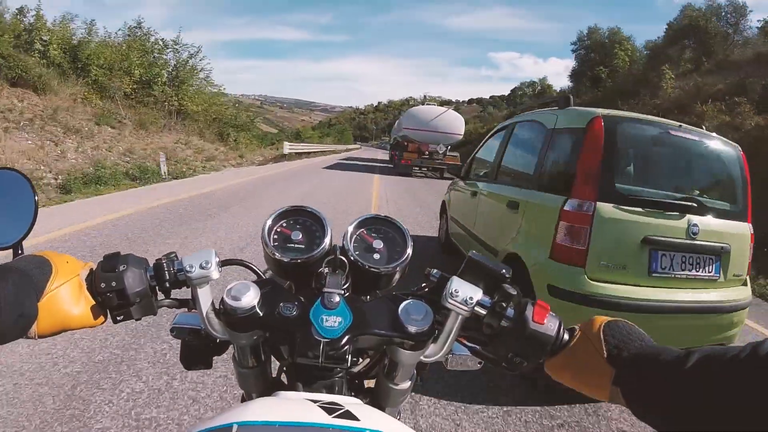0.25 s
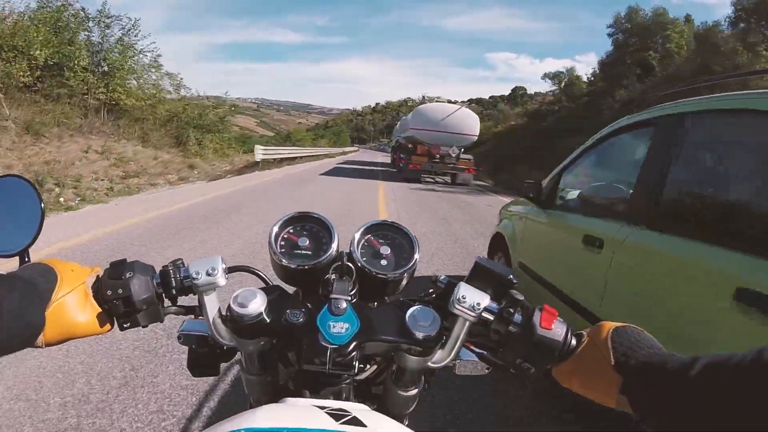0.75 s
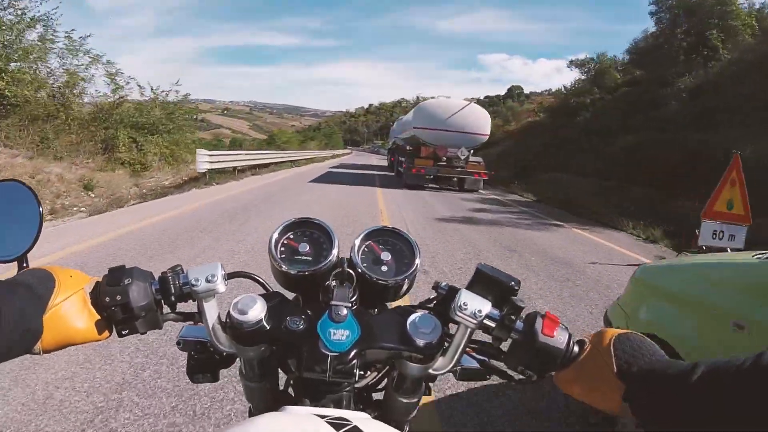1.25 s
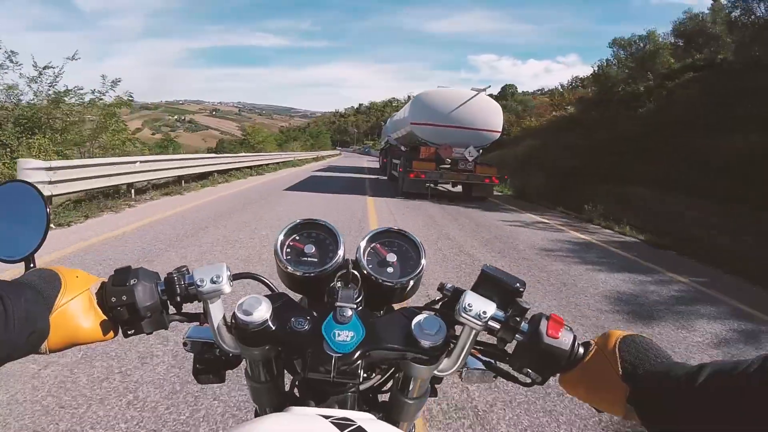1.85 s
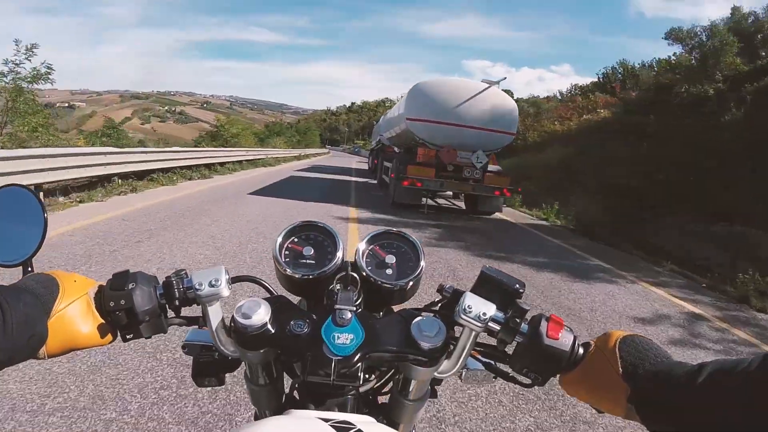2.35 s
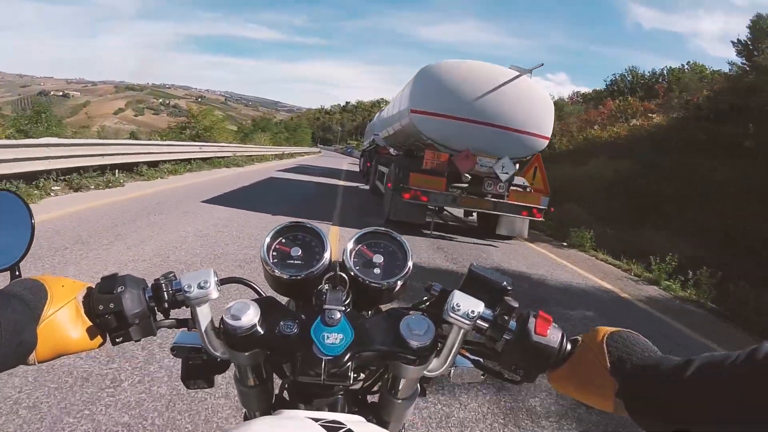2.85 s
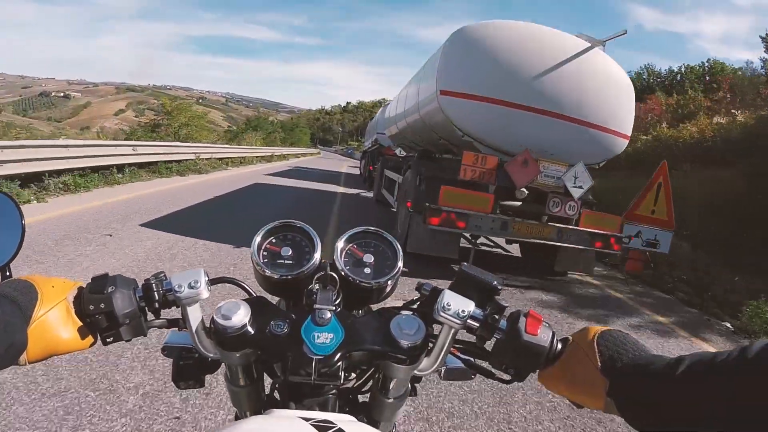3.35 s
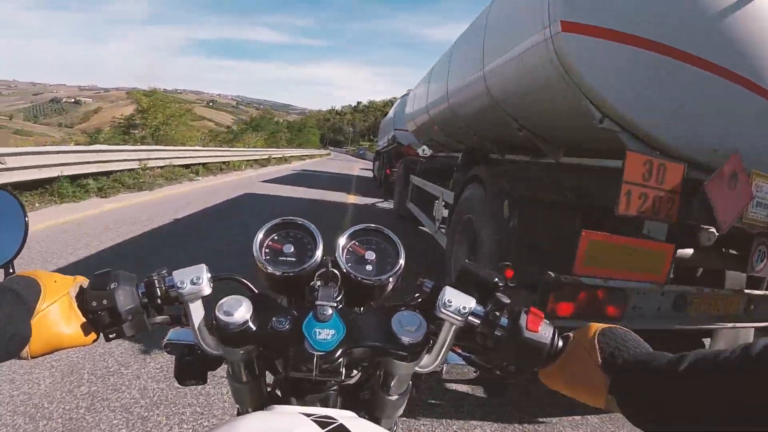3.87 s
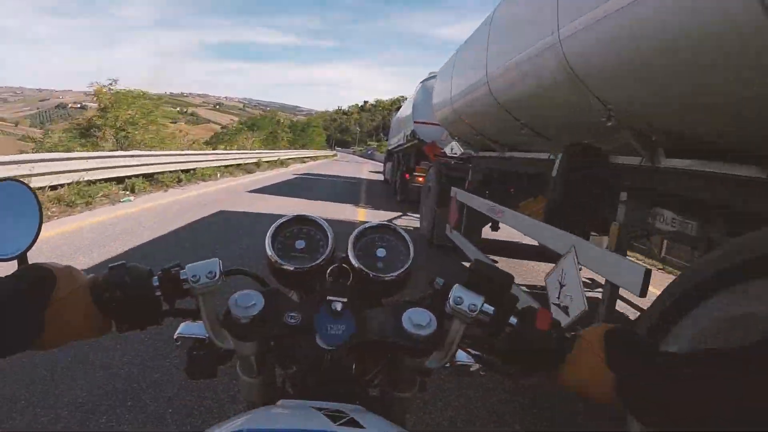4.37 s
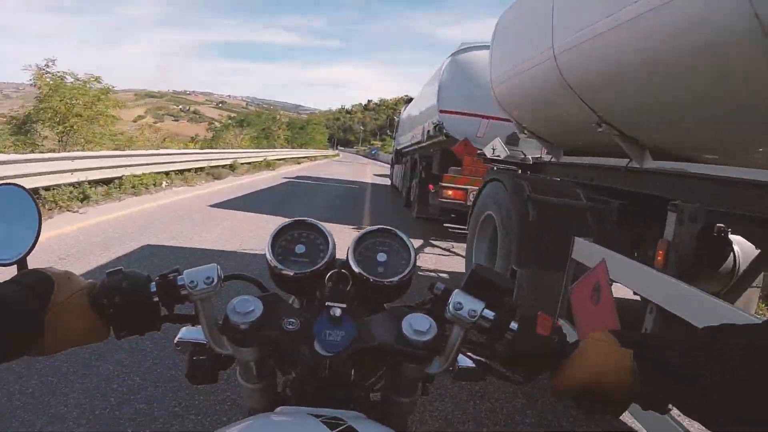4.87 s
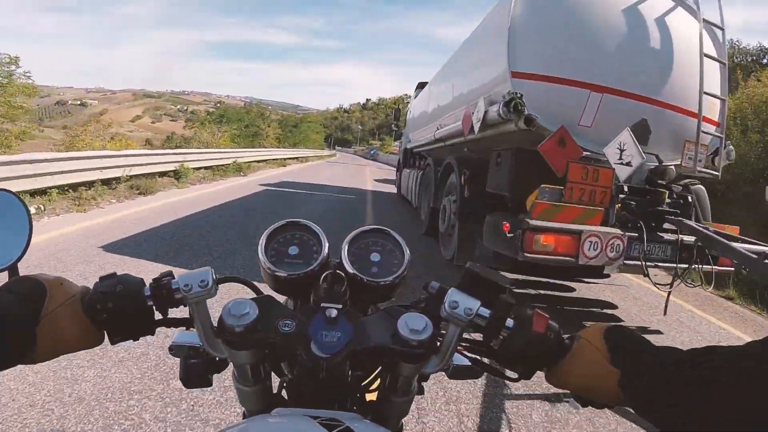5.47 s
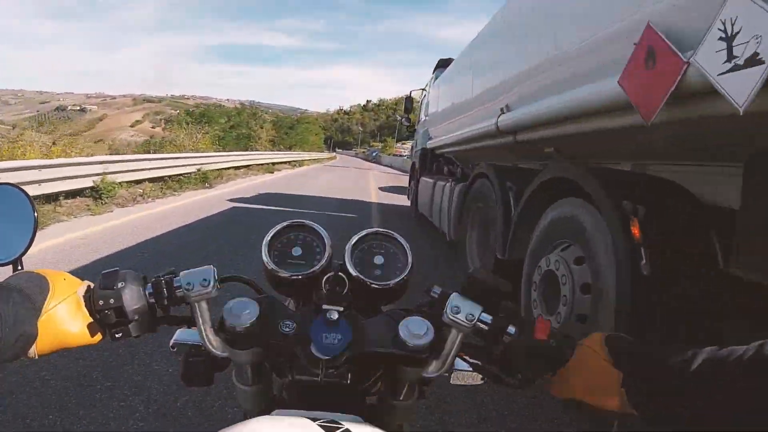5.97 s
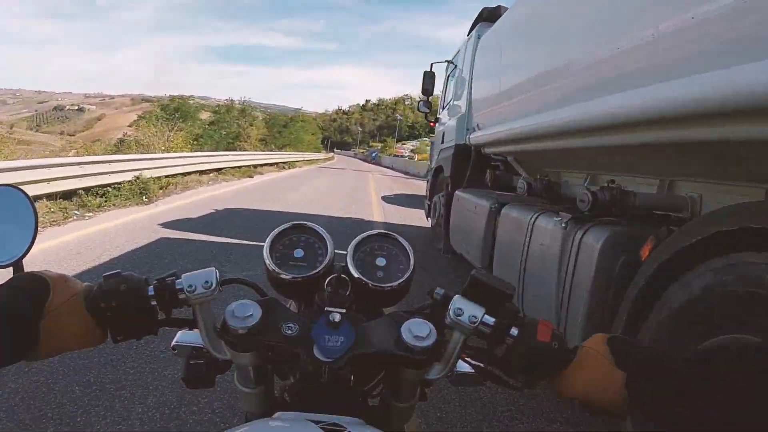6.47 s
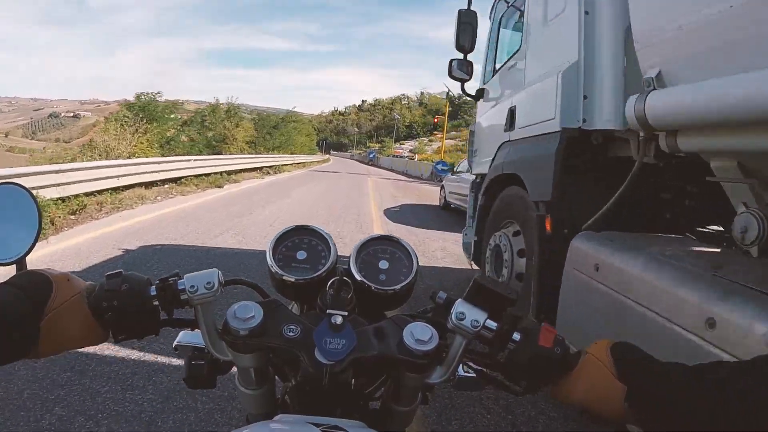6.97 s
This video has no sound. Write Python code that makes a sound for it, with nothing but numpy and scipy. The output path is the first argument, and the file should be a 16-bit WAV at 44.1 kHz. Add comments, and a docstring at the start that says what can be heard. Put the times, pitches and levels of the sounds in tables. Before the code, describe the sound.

Close motorcycle engine, uneven paired firings with hollow exhaust pulses, gas rasp and metallic clatter, decelerating steadily. A brief tyre hiss marks a car being overtaken. Around four seconds the engine coasts down to low idle and a tanker lorry's broad rumble comes up on the passing side. Downshift blips bark and crackle, each followed by a falling hum, with small metal clicks. Outdoors, slight wind, microphone on the rider's body.

```python
"""On the road, microphone at the rider's chest: a V-twin motorcycle passes a car on a closed throttle,
drops to idle with the clutch pulled and rolls along a tanker lorry; barks mark three downshift blips.
Unevenly spaced firings are pulses that ring resonant filters; gas rasp and crackle are gated noise,
ringing metal and pipes are decaying sines, gear whines and a faint squeal are sines,
and lever clicks are noise bursts. Behind lie coloured noise for tyres, car, lorry and a little wind."""
import sys
import numpy as np
from scipy import signal
from scipy.fft import rfft, irfft, next_fast_len
from scipy.io import wavfile
from scipy.ndimage import uniform_filter1d

SR = 44100
rng = np.random.default_rng(int(sys.argv[2]) if len(sys.argv) > 2 else 0)


def materialize(psi):
    """Save the field psi as 16-bit PCM at rate SR to the path in sys.argv[1].

    A 1-D psi becomes a single channel; in a 2-D psi each row is a channel.
    """
    bounded = np.clip(np.atleast_2d(psi).T, -1, 1)
    quanta = np.round(bounded * 32767).astype(np.int16)
    wavfile.write(sys.argv[1], SR, quanta)


N = 317961
TIME = np.arange(N) / SR  # s
CRUISE_HZ = 21  # four-stroke cycles per second at which the engine levels are stated


def engine(speed, cycles):
    """The V-twin at close range: suction, idle pops, steep fronts, gas rasp and knocking metal per firing."""
    times, cylinder = firings(cycles, jitter_s=.00004)
    scatter_db = spread(.8, count=len(times))  # firings differ a little in strength
    idling = idle_share(speed)
    rasp_db = loudness((-60.5, 0.67, -3.5), speed)
    pulses = suction(speed, times, cylinder, scatter_db, idling)
    pops = idle_pops(times, cylinder, scatter_db, idling)
    front = fronts(speed, times, cylinder, idling)
    metal = clatter(times, undb(rasp_db - 1.5) * (1 - idling))  # a little below the rasp
    return pulses + pops + front + gas_rasp(times, rasp_db) + metal


# Engine speed while the wheel drives it: [t/s, four-stroke cycles per second/Hz]
IN_GEAR_SPEED = [(0, 20.34), (.3, 18.55), (.45, 18.99), (.65, 23.26), (1, 22.72), (2, 21.04), (3, 19.35),
                 (3.959, 17.64)]
# Throttle blips: [t/s, rise/s, gain in cycles per second/Hz, coast/s]
THROTTLE_BLIPS = [(5.167, .072, 8.61, .759), (5.913, .115, 2.0, .385), (6.33, .139, 8.17, .769)]
IDLE_HZ, COAST_S, COAST_BEND = 10.725, .829, 1.458  # cycles per second, time to idle, bend of the fall


def engine_speed():
    """Cycles per second: held by the wheel, then coasting to idle; each blip spins it up and it coasts again."""
    def coast(start, length):
        # falls fast at first
        return np.clip(1 - (TIME - start) / length, 0, 1) ** COAST_BEND
    release_s = IN_GEAR_SPEED[-1][0]
    speed = IDLE_HZ + (curves(IN_GEAR_SPEED)[0] - IDLE_HZ) * coast(release_s, COAST_S)
    for start, rise, gain, length in THROTTLE_BLIPS:
        spin_up = np.clip((TIME - start) / rise, 0, 1)
        speed = speed + gain * spin_up * coast(start + rise, length)
    return speed


FIRST_FIRING, VEE_GAP = .25, 270 / 720  # in cycles


def firings(cycles, jitter_s):
    """Times of all firings and their cylinder: the second follows after 270 degrees, then 450 of rest."""
    count = np.arange(2 * int(cycles[-1] + 1))
    cylinder = count % 2
    due = count // 2 + FIRST_FIRING + VEE_GAP * cylinder
    times = np.interp(due, cycles, TIME, right=TIME[-1] + 1)
    return times + jitter_s * rng.standard_normal(len(times)), cylinder


def clutch():
    """0 in gear, 1 with the lever pulled."""
    pull_s, takes_s = 4.15, .04
    return np.clip((TIME - pull_s) / takes_s + .5, 0, 1)


def cracked():
    """1 while the throttle is just open, 0 once it is shut."""
    shut_s = 0.884
    return np.clip((shut_s - TIME) / 0.06 + .5, 0, 1)


def idle_share(speed):
    """Idle firing takes over at low speed, clutch pulled; a wavering share pops on the cracked throttle."""
    catch_hz, catch_range_hz = 14.24, 0.48  # cycles per second
    idling = clutch() * (1 + np.tanh((catch_hz - speed) / (2 * catch_range_hz))) / 2
    popping = np.minimum(0.14 * undb(3 * walk(30)), 1)
    return idling + popping * cracked()


def loudness(law, speed):
    """Level in dB of a part of the engine sound: in gear at CRUISE_HZ, rise per Hz, change clutch pulled."""
    cruise_db, db_per_hz, free_db = law
    return cruise_db + db_per_hz * (speed - CRUISE_HZ) + free_db * clutch()


# Exhaust resonances on a closed throttle in gear: [f/Hz, level/dB]
OVERRUN_RESONANCES = [(20, -36), (40, -3), (62, 7), (95, 4), (125, -3), (155, -6), (178, -13.5), (210, -4),
                      (240, -6), (258, -11), (292, -6), (335, -29), (390, -15.5), (450, -22), (570, -36.5),
                      (700, -33), (1150, -56), (9000, -135)]
# Exhaust resonances while the engine spins down freely: [f/Hz, level/dB]
COASTING_RESONANCES = [(25, -43), (40, -9), (55, 7), (72, 8), (88, 4), (105, -10), (135, -0.5), (165, -7.5),
                       (215, -2.5), (260, -12.5), (295, -5), (335, -24), (450, -16.5), (580, -30.5),
                       (900, -43.5), (9000, -130)]


def suction(speed, times, cylinder, scatter_db, idling):
    """Closed throttle: hollow suction pulses return from the pipe end; coasting, a smooth falling hum."""
    lead_s, echo_ms, echo_share = 0.00068, 10.53, 0.43
    # each suck starts just before the steep front, loosely timed with the clutch pulled
    looseness_s = .0004 * np.interp(times, TIME, clutch())
    sucks = times - lead_s + looseness_s * rng.standard_normal(len(times))
    size = undb(scatter_db - 1.5 * (cylinder - .5))  # the second cylinder sucks less
    pulses = train(sucks, size)
    # the pipe gives back the lows of each pulse
    echo = colour(train(sucks + echo_ms / 1000, size), [(300, -0.5), (600, -5.5), (1200, -18.5)])
    pulses = (pulses + echo_share * echo) * (1 - idling)
    overrun_gain = undb(loudness((-23.5, 0.18, -0.39), speed)) * (1 - clutch())
    overrun = -play(pulses * overrun_gain, ring(OVERRUN_RESONANCES))
    hum = -play(pulses * undb(-26.5) * clutch(), ring(COASTING_RESONANCES))
    return body(overrun, speed) + hum


def body(pulses, speed):
    """Faster running gives the suction pulses more body in the low middle."""
    db_per_hz, from_hz = 1.62, 17.06  # growth, and the cycles per second where it is neutral
    middle = colour(pulses, [(185, -24), (220, -1), (265, 0), (300, -14), (340, -30)])
    growth_db = db_per_hz * np.maximum(speed - from_hz, -1)
    return pulses + middle * (undb(growth_db) - 1)


# Exhaust resonances at idle: [f/Hz, level/dB]
IDLE_RESONANCES = [(25, -41.5), (50, 0), (72, 6.5), (86, 8), (100, -1), (120, -9.5), (150, -2.5),
                   (180, 2.5), (235, -0.5), (285, 1), (335, -20), (450, -16), (600, -40.5), (1000, -49),
                   (9000, -125)]


def idle_pops(times, cylinder, scatter_db, idling):
    """Idle: short, even pops ring the exhaust, the second cylinder 3 dB stronger."""
    pop = undb(scatter_db - 3.0 * (2.5 - cylinder))
    return play(train(times, pop) * undb(-20) * idling, ring(IDLE_RESONANCES))


# Resonances set off by the steep front of a pulse: [f/Hz, level/dB]
FRONT_RESONANCES = [(100, -33.5), (335, 8), (390, 11.5), (455, 11), (570, -1), (690, 8), (800, -4),
                    (920, -11), (1090, -17.5), (1270, -34.5), (1600, -18), (2250, -40), (3700, -50),
                    (12000, -78)]
# Level of the pulse fronts along the ride: [t/s, level/dB]
FRONT_LEVEL_IN_TIME = [(.8, 0), (1.15, -3.5), (1.6, -4), (2.2, -3), (2.7, 0), (3.15, 3), (3.9, 1)]


def fronts(speed, times, cylinder, idling):
    """Each firing starts with a front, steeper on some than on others, that snaps and rings the headers."""
    full_hz, fade_db_per_hz = 21.2, 3  # below this speed the front flattens
    steep = undb(spread(5.0, count=len(times)) - 1.7 * cylinder)
    front_db = loudness((-29.5, -0.061, -2), speed) + curves(FRONT_LEVEL_IN_TIME)[0]
    front_db = front_db - fade_db_per_hz * np.maximum(full_hz - speed, 0)
    # flatter at idle and on a cracked throttle
    flatter_db = -25 * idling * clutch() - 7 * cracked()
    snap = -play(train(times, steep) * undb(front_db + flatter_db), ring(FRONT_RESONANCES))
    # against the front, the header ring grows as the engine slows
    header_gain = undb(front_db + 1.5 * (CRUISE_HZ - speed)) * (1 - clutch()) * (1 - cracked())
    return snap + headers(times, cylinder, header_gain)


# Ring of each cylinder's header pipe: [f/Hz, level/dB against the front, t60/s]
HEADER_PIPES = [(792, -10, 0.021), (1056, -16, 0.022)]


def headers(times, cylinder, gain):
    """A sharp front rings each cylinder's own header pipe as a decaying sine."""
    size = undb(spread(4.5, count=len(times)))
    return -sum(play(train(times, size * (cylinder == k)) * gain, modes([mode]))
                for k, mode in enumerate(HEADER_PIPES))


# Colour of the gas noise of every firing: [f/Hz, level/dB]
RASP_COLOUR = [(150, 2), (450, 10.5), (750, 5), (1000, -0.5), (1270, -7.5), (1600, -4), (2250, -9),
               (2600, -15.5), (3700, -18), (4500, -28), (5400, -26.5), (7000, -33), (8200, -23),
               (10500, -56.5)]


def gas_rasp(times, rasp_db):
    """Gas rushes out in two close bursts after each firing and dies away in the rest, over a steady floor."""
    attack_s, decay_s = 0.0011, 0.012
    gas = undb(spread(2.5, count=len(times)))
    bursts = train(times, gas) + .5 * train(times + 0.0012, gas)
    gate = play(bursts, fade(decay_s) - fade(attack_s)) + 0.17
    return gated(gate / gate.std() * undb(rasp_db), RASP_COLOUR, side_db=-6.0)


# Ring of the engine's metal: [f/Hz, level/dB, t60/s]
ENGINE_METAL = [(1522, 1.5, 0.034), (2290, -4, 0.042), (3250, -10.5, 0.022), (3820, -9.5, 0.023),
                (4070, -21.5, 0.14), (5400, -15.5, 0.024)]


def clatter(times, gain):
    """Each firing knocks the engine's metal, every mode a little late and with a strength of its own."""
    sound = 0
    for mode in ENGINE_METAL:
        late = times + .005 * rng.random(len(times))
        size = undb(spread(8, count=len(times)))
        sound = sound + play(train(late, size) * gain, modes([mode]))
    return sound


# Barks in the throttle blips: full firings, and at 5.268 s a weak afterburn in the pipe: # [t/s, thump
# level/dB, length of the push/s, crack level/dB, crack decay/s]
BLIP_BARKS = [(5.187, -19.5, 0.00073, -39, 0.016), (5.2097, -14.5, 0.000052, -28, 0.0077),
              (5.268, -27.5, 0.00098, -60, 0.0084), (5.969, -18.5, 0.00064, -39, 0.0068),
              (6.389, -18, .0005, -35.5, 0.0079), (6.429, -20.5, 0.00035, -41, 0.017),
              (6.4503, -17, 0.00022, -41, 0.0086)]
# Exhaust resonances on a strong firing: [f/Hz, level/dB]
BARK_RESONANCES = [(25, -36), (55, -2.5), (90, 21.5), (145, 5), (255, 17), (305, -2), (360, -3.5),
                   (470, 9.5), (570, -20), (700, 6.5), (830, -29), (1400, -50.5), (4000, -79), (12000, -79)]
# The pipe rings on after a strong firing: [f/Hz, level/dB, t60/s]
PIPE_RING = [(174, -8, 0.13), (242.5, -21.5, 0.1), (333, -1.5, 0.067), (468, -14.5, 0.075),
             (696, -31.5, 0.17), (1133, -28.5, 0.16), (1654, -19.5, 0.048), (2060, -43, 0.032),
             (2180, -42, 0.026), (2645, -21.5, 0.063), (3715, -25.5, 0.034)]
# Colour of the crack of a strong firing: [f/Hz, level/dB]
CRACK_COLOUR = [(300, -21), (520, 17), (730, 10), (860, 2), (1100, -0.5), (1420, -5), (1670, -3),
                (1850, -4.5), (2100, -1), (2750, -9), (3100, -10), (4800, -18.5), (8300, -22.5),
                (9700, -35.5), (12000, -30.5), (16000, -39)]


def barks(crack_rise_s=0.00043, scatter=0.085, scatter_s=0.098, return_ms=8.7, return_share=0.089):
    """A strong firing thumps and rings the hot pipe, returns from its end; crackling gas scatters off the road."""
    pulses, gate = 0, 0
    for s, thump_db, push_s, crack_db, crack_s in BLIP_BARKS:
        hit = train(np.array([s]), np.ones(1))
        back = train(np.array([s + return_ms / 1000]), np.array([return_share]))
        push = fade(push_s) / fade(push_s).sum()
        pulses = pulses + undb(thump_db) * play(hit + back, push)
        burst = fade(crack_s) - fade(crack_rise_s) + scatter * fade(scatter_s)
        gate = gate + undb(crack_db) * play(hit, burst)
    thump = -play(pulses, ring(BARK_RESONANCES)) - undb(-2.0) * play(pulses, modes(PIPE_RING))
    crackle = undb(3.5 * walk(1500))  # burning gas flickers fast
    return thump + gated(gate * crackle, CRACK_COLOUR, side_db=-7.0)


# Stray firings that catch on an almost closed throttle: [t/s, front level/dB, thump level/dB]
STRAY_FIRINGS = [(.080, -24, -43), (0.216, -30, -27), (.266, -39, -30.5), (0.343, -29, -40.5),
                 (.428, -26.5, -25), (.499, -26, -48.5), (.547, -48.5, -38.5), (0.664, -35.5, -29.5),
                 (0.717, -40, -21), (.754, -27, -25), (0.814, -34.5, -27), (4.268, -39.5, -29),
                 (4.341, -45, -27), (5.132, -32, -37), (5.297, -34.5, -25.5), (5.42, -35, -33),
                 (5.638, -54, -37), (6.021, -31, -45.5), (6.049, -33, -32.5), (6.1, -33.5, -37),
                 (6.128, -40.5, -30.5), (6.186, -34, -36.5), (6.364, -52, -21)]


def strays():
    """A stray firing is a steep front and a round thump, each of its own strength."""
    times, front_db, thump_db = np.transpose(STRAY_FIRINGS)
    front = -play(train(times, undb(front_db)), ring(FRONT_RESONANCES))
    thump = play(train(times, undb(thump_db)), ring(IDLE_RESONANCES))
    return front + thump


# Gear whines, each swelling and fading: [level/dB, loudest at t/s, half length/s]
WHINE_SWELLS = [(-65, 1.3, .35), (-61, .79, .075), (-82.5, 1.65, 1.1)]
WHINE_MULTIPLES = (47, 79, 235)  # whine pitch in multiples of the cycle rate


def gear_whine(cycles, waver_per_multiple=.007):
    """Thin sines locked to the engine while the wheel loads the gears; the higher ones waver more."""
    whines = 0
    for multiple, (db, s, half) in zip(WHINE_MULTIPLES, WHINE_SWELLS):
        waver = waver_per_multiple * multiple * walk(150)  # radians
        tone = np.sin(2 * np.pi * multiple * cycles + waver)
        whines = whines + tone * undb(db + 3 * walk(40)) * swell(s, half)
    return whines * (1 - clutch())


# Clutch and gear lever clicks: [t/s, level/dB]
LEVER_CLICKS = [(4.192, -78), (4.25, -84), (4.955, -69.5), (5.886, -68), (5.932, -68), (6.297, -71)]
# Colour of the clicks: [f/Hz, level/dB]
LEVER_COLOUR = [(800, -24), (2500, 6.5), (5500, 3), (7000, -2), (8500, -1), (11000, -3), (14000, -34)]


def levers(decay_s=0.018):
    """Small metal clicks of clutch and gear change: coloured noise that dies away quickly."""
    times, db = np.transpose(LEVER_CLICKS)
    return gated(play(train(times, undb(db)), fade(decay_s)), LEVER_COLOUR, side_db=-6)


def squeal():
    """A brief, faint, very high wavering sine, like a brake pad touching its disc."""
    touch = np.exp(-((TIME - 6.61) / .06) ** 2)
    return np.sin(2 * np.pi * 10297 * TIME + .5 * walk(60)) * undb(-76) * touch


# Rumble of the bike's engine and tyres: [f/Hz, level/dB]
BIKE_ROAD_COLOUR = [(30, -3.5), (100, -1.5), (280, 12.5), (370, 30.5), (470, 27.5), (700, 18.5),
                    (1200, -4.5), (1700, -1.5), (2700, -13.5), (4000, -13.5), (6000, -19.5), (8500, -40),
                    (9700, -31.5), (12000, -26.5), (15000, -70)]


def bike_rumble(speed):
    """The bike's own tyres hiss on under a rumble that follows the engine: fluttering noise."""
    flutter_db = .9 * walk(30)
    rumble_db = loudness((-51, 0.68, -2), speed)
    rolling = np.hypot(undb(-70.5), undb(rumble_db))  # tyres and rumble add in power
    return noise(BIKE_ROAD_COLOUR, side_db=-16.5) * rolling * undb(flutter_db)


# Road noise of the lorry: [f/Hz, level/dB]
LORRY_COLOUR = [(30, 23.5), (100, 10.5), (280, 19.5), (340, 15.5), (420, 11.5), (480, 18), (800, -4.5),
                (1250, -1), (1780, -2), (2300, -10.5), (2750, -7), (3400, -14), (6300, -16), (7300, -24.5),
                (8500, -27), (9700, -35), (15000, -37.5)]
# The lorry's axles go by: [t/s, level/dB, half length/s]
LORRY_AXLES = [(4.66, -56, 0.33), (5.273, -56, 0.19), (5.616, -54.5, 0.11), (5.986, -58, 0.082),
               (6.555, -53.5, 0.33), (7.074, -53.5, 0.15)]


def lorry():
    """The lorry alongside: road noise that comes up once and swells at each axle, adding in power."""
    from_s, rise_s = 3.92, 0.26
    flutter_db = 1.1 * walk(24)
    alongside = undb(-55) * (1 + np.tanh((TIME - from_s) / rise_s)) / 2
    axle_power = sum((undb(db) * swell(s, half)) ** 2 for s, db, half in LORRY_AXLES)
    near = np.sqrt(alongside ** 2 + axle_power)
    return noise(LORRY_COLOUR, side_db=-9.0) * near * undb(flutter_db)


# Hiss of the overtaken car's tyres: [f/Hz, level/dB]
CAR_COLOUR = [(200, 4.5), (900, 4), (1700, -3.5), (2700, -3), (4000, -12), (5300, -8.5), (6600, -12),
              (7300, -16.5), (8400, -18.5), (9700, -31), (11500, -22), (15000, -52)]


def passing_car(car_db=-61, abreast_s=1.39, half_s=0.39):
    """The car's tyres swell and fade as its wheels go by."""
    return noise(CAR_COLOUR, side_db=-4.0) * undb(car_db) * swell(abreast_s, half_s)


def wind():
    """A little wind buffets the microphone: wide low noise in slow gusts."""
    gusts_db = -52 + 3 * walk(5)
    outline = [(15, -27.0), (35, -14.5), (90, -9.0), (300, 1.0), (1500, -88.0), (9000, -120)]
    return noise(outline, side_db=4.5) * undb(gusts_db)


# Level of the left microphone port minus the right: [f/Hz, level/dB]
PORT_LEVELS = [(60, 3), (95, 2.4), (150, -2), (230, -4), (550, -3.6), (900, -2.6), (2000, -1), (8000, -2)]
# Lead of the left microphone port over the right: [f/Hz, phase/rad]
PORT_LEADS = [(45, 0), (100, -.45), (130, -.65), (152, -1.05), (195, -.4), (260, -.22), (360, -.7),
              (460, .05), (700, -.4), (900, -.9), (1050, -1.9), (1250, 1.9), (1450, 1.3), (2000, 0),
              (2500, -.7), (2900, .3), (4200, -.3), (4700, 1), (7000, 1.2), (7700, 0)]


def ports(sound):
    """The two microphone ports differ in level and phase by frequency; a large lead also lifts both."""
    size = next_fast_len(N + 4096, True)
    hz, radians = np.transpose(PORT_LEADS)
    lead = np.tan(np.interp(np.arange(size // 2 + 1) * SR / size, hz, radians) / 2)
    heard = []
    for ear, sign in zip(sound, (1, -1)):
        level = shape([(f, sign * db / 2) for f, db in PORT_LEVELS], size)
        heard.append(irfft(rfft(ear, size) * (1 + sign * 1j * lead) * level, size)[:N])
    return np.array(heard)


def undb(db):
    """Decibels to gain."""
    return 10 ** (np.asarray(db) / 20)


def curves(table):
    """Each column of a table, joined by straight lines in time."""
    s, *columns = np.transpose(table)
    return [np.interp(TIME, s, c) for c in columns]


def shape(points, size):
    """Gain of a (f/Hz, level/dB) outline on the bins of a transform, straight over log frequency."""
    hz, db = np.transpose(points)
    bins_hz = np.arange(size // 2 + 1) * SR / size
    return undb(np.interp(np.log(bins_hz + 1), np.log(hz), db))


def colour(x, points):
    """Filter by an outline, without delay."""
    size = next_fast_len(N + 4096, True)
    return irfft(rfft(x, size) * shape(points, size), size)[..., :N]


def ring(points, size=8192):
    """Causal (minimum-phase) response with the given resonances to one push, peak 1."""
    cepstrum = irfft(np.log(shape(points, size)))
    # fold the cepstrum onto positive time
    cepstrum[1:size // 2] *= 2
    cepstrum[size // 2 + 1:] = 0
    response = irfft(np.exp(rfft(cepstrum)))[:size // 2]
    return response / np.abs(response).max()


def modes(table):
    """Ring of a struck body: decaying sines from (f/Hz, level/dB, t60/s)."""
    return sum(undb(db) * np.sin(2 * np.pi * hz * TIME[:SR // 2]) * fade(t60 / np.log(1000))
               for hz, db, t60 in table)


def play(pulses, response):
    """Every pulse sets off the response."""
    return signal.fftconvolve(pulses, response)[:N]


def train(times, sizes):
    """Pulses of given sizes at given times."""
    return np.bincount(np.clip(times * SR, 0, N).astype(int), sizes, N + 1)[:N]


def fade(seconds):
    """Exponential decay with this time constant."""
    return np.exp(-TIME[:SR // 2] / seconds)


def swell(centre_s, half_s):
    """Gain that rises to 1 and falls again, at one half half_s from the centre."""
    return 1 / (1 + ((TIME - centre_s) / half_s) ** 4)


def spread(db, count):
    """Random levels within plus or minus db."""
    return db * (2 * rng.random(count) - 1)


def walk(rate):
    """Smooth chance with a spread of 1, rate new values a second."""
    k = int(SR / rate)
    steps = np.repeat(rng.standard_normal(N // k + 1), k)
    wander = uniform_filter1d(uniform_filter1d(steps, k), k)[:N]
    return wander / wander.std()


def stereo(mid, side, side_db):
    """Left and right from the middle and a side signal at its own level."""
    return mid + undb(side_db) * side * np.array([[1], [-1]])


def noise(points, side_db):
    """Coloured stereo noise, its middle of rms 1."""
    mid, side = colour(rng.standard_normal((2, N)), points)
    return stereo(mid, side, side_db) / mid.std()


def gated(gate, points, side_db):
    """Bursts of turbulence, coloured by the passage they leave through."""
    mid, side = colour(rng.standard_normal((2, N)) * gate, points)
    return stereo(mid, side, side_db) / np.sqrt(np.mean(shape(points, size=8192) ** 2))


def scene():
    """The bike and the road; the deep bass leans left, the body of the exhaust right."""
    speed = engine_speed()
    cycles = np.cumsum(speed) / SR
    bike = engine(speed, cycles) + barks() + strays() + gear_whine(cycles) + levers() + squeal()
    background = bike_rumble(speed) + lorry() + passing_car() + wind()
    return ports(bike + background)


def record(dry):
    """The camera cuts the top: a steep elliptic low-pass at 15.7 kHz."""
    return signal.sosfilt(signal.ellip(8, .2, 70, 15700, fs=SR, output="sos"), dry)


dry = scene()
out = record(dry)
materialize(out)
```